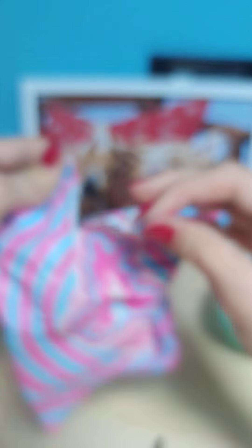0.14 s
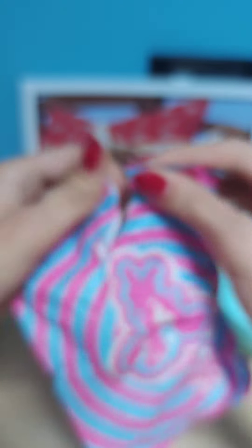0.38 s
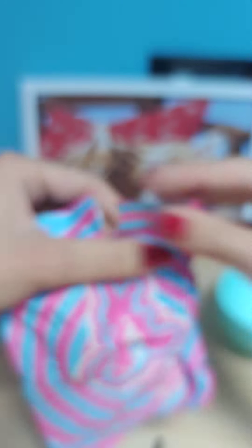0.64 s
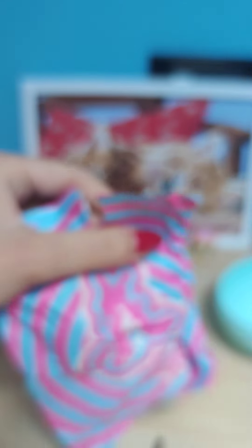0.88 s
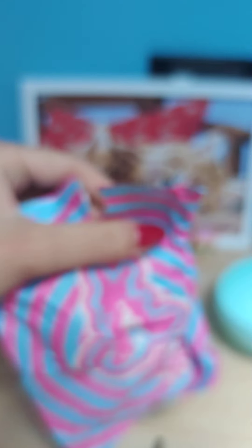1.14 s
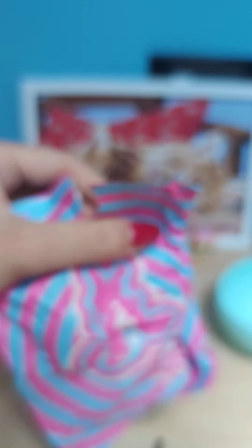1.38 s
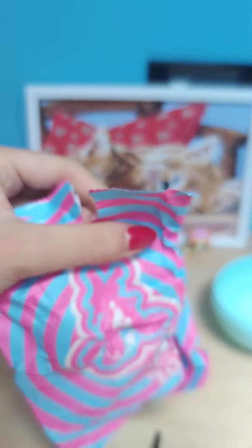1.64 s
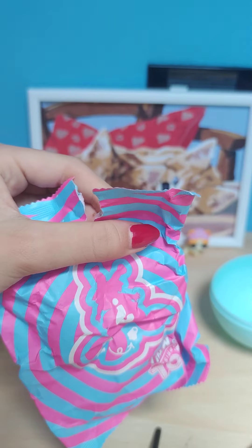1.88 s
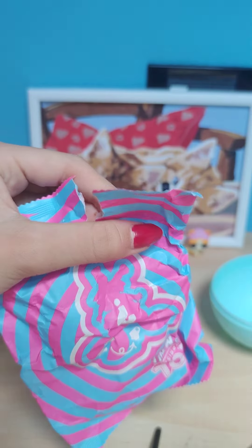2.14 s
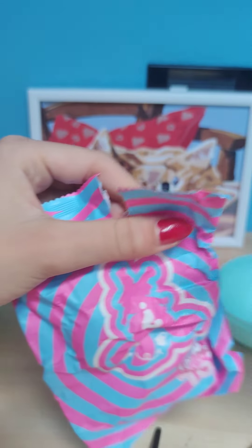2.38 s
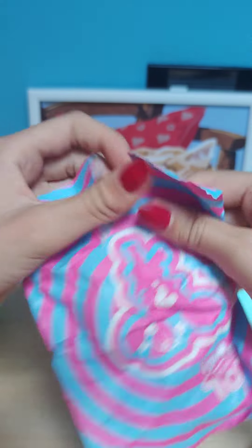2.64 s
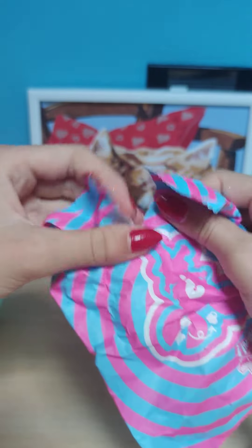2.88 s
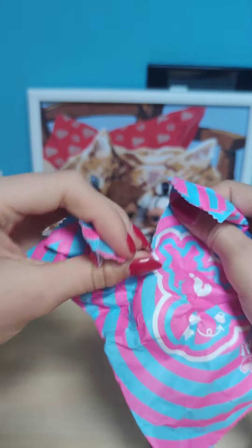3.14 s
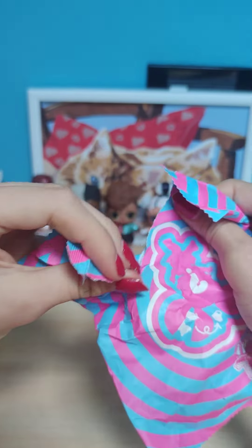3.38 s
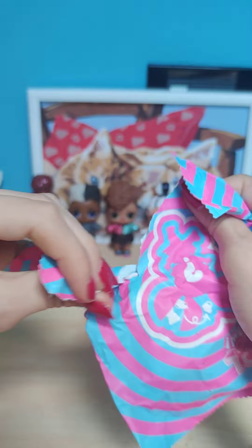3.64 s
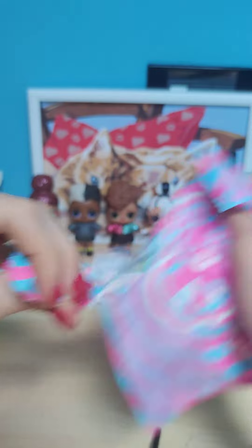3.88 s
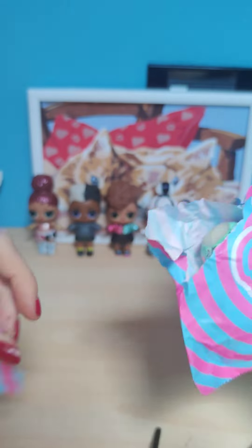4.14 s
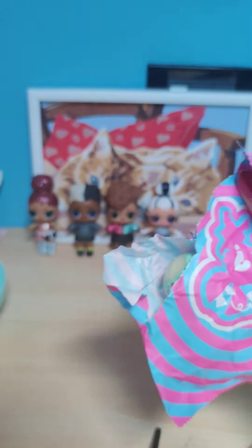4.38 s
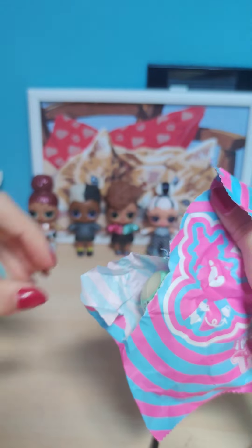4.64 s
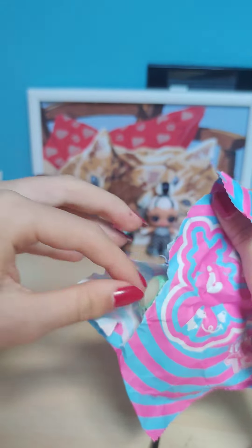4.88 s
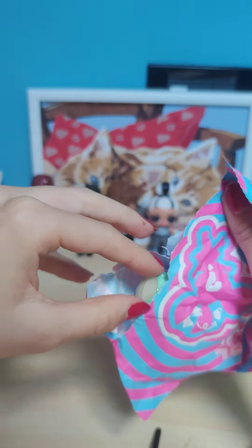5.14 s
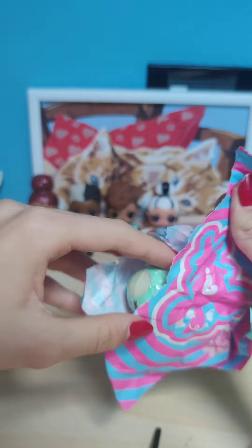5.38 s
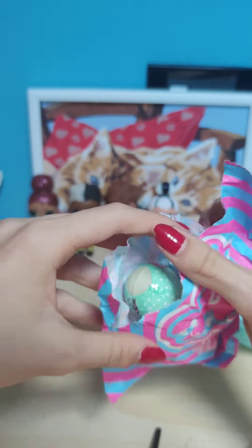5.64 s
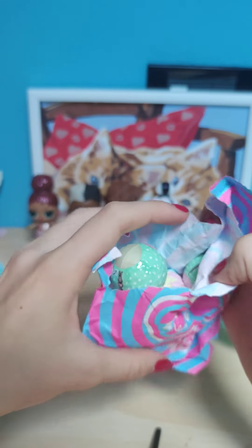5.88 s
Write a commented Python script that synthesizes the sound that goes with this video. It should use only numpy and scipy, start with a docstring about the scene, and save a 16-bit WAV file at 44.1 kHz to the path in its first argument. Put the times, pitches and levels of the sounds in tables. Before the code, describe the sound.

Crisp plastic wrapper crackles and rips on a desk in a small quiet room, its busy bouts separated by near silence and faint hiss.

```python
"""Hands tear and crumple a thin plastic pouch on a desk, close to two microphones, in a small quiet room.
A tear and sharp snaps open over a bed of tiny crackles; near silence follows, then a faint low tone.
A long dense bout of crumpling comes next, with jolts of the desk, then sparse snaps and a last busy bout.
Shaped noise makes the snaps, crackle and tears; low resonances boom along as the air and walls of the pouch.
Reflections and a short tail answer the pouch, and the microphones hiss throughout."""
import sys
import numpy as np
from scipy import signal
from scipy.fft import rfft, irfft, next_fast_len
from scipy.io import wavfile
from scipy.ndimage import uniform_filter1d, map_coordinates

SR = 44100
rng = np.random.default_rng(int(sys.argv[2]) if len(sys.argv) > 2 else 0)


def invert_db(level):
    """Linear amplitude ratio for a level in decibels (20 dB per decade), elementwise."""
    return 10 ** (np.asarray(level, dtype=float) / 20)


def transcribe(u):
    """Save the signal u as a 16-bit wav file named by the first command-line argument.

    u: samples, shape (n,) or (channels, n), limited to [-1, 1]; the rate is SR.
    q: integer samples, one column per channel.
    """
    v = np.clip(np.atleast_2d(u).T, -1, 1)
    q = np.round(v * 32767).astype(np.int16)
    wavfile.write(sys.argv[1], SR, q)


N = 264908

# Creases that buckle. Each row: start in seconds, peak in dB, panel pitch in Hz,
# treble crack against the panel in dB, pouch boom against the snap in dB.
BUCKLES = [(0.0064, -7.5, 3490, -20.5, -30), (0.0263, -7.5, 4100, -17, -30.5),
           (0.1296, -26.5, 2730, -33.5, -13), (0.2379, -27, 1960, -15, -8.5), (0.2523, -24, 2140, -18, -6),
           (0.3204, -25.5, 7250, -9, -16), (0.3301, -18, 6930, -15.5, -18), (0.375, -33, 2670, -12, -7),
           (0.4254, -30, 2290, -15, -13), (0.5277, -35, 1430, -8.5, -1.5), (0.5651, -12, 2540, -33, -20),
           (0.6604, -13.5, 3440, -17.5, -19.5), (0.6834, -30.5, 1980, -26.5, -20),
           (1.259, -54, 1260, -24, -20), (2.1839, -44.5, 3790, -19, -6.5), (2.4269, -43.5, 2100, -15, -2.5),
           (2.4718, -27.5, 2100, -26, -15.5), (2.5855, -23.5, 2575, -17.5, -21),
           (2.602, -25.5, 2080, -16.5, -9), (2.6429, -25, 1960, -24, -25), (2.7013, -24.5, 2540, -10, -5),
           (2.7262, -7, 4840, -24.5, -44), (2.7546, -14, 4140, -14.5, -37), (2.8978, -14, 5290, -23.5, -28),
           (2.9272, -15, 4550, -16, -34), (2.9412, -13.5, 2100, -20, -32), (2.9642, -19.5, 7070, -22, -41),
           (2.9816, -16, 3130, -17, -34), (2.9925, -25, 3010, -10.5, -32), (3.039, -15, 2690, -18, -37),
           (3.0694, -18.5, 2050, -8, -19), (3.0944, -10.5, 4830, -14.5, -45),
           (3.1288, -9, 3790, -21.5, -38), (3.1862, -24.5, 5610, -17, -17), (3.2216, -20, 2050, -22, -9),
           (3.272, -17.5, 2080, -17, -35), (3.2994, -23, 4110, -12.5, -37),
           (3.3189, -7.5, 5320, -24.5, -53), (3.3568, -24, 2060, -24, -33),
           (3.4331, -20.5, 2100, -15.5, -36), (3.4481, -17, 2020, -16, -38),
           (3.4635, -18.5, 1260, -15, -26), (3.4764, -9.5, 4030, -22.5, -27.5),
           (3.4894, -12.5, 2600, -22.5, -14), (3.5269, -14.5, 2640, -23, -32),
           (3.5648, -21.5, 1730, -24.5, -26), (3.5773, -16, 2620, -26, -23),
           (3.5902, -13.5, 4070, -30, -29.5), (3.6119, -33.5, 2290, -13, -18),
           (3.6274, -16, 1830, -25.5, -19.5), (3.6361, -7.5, 2590, -18.5, -28),
           (3.6526, -8.5, 2100, -19, -38), (3.6844, -6.5, 2530, -20, -17.5),
           (3.6885, -12, 2230, -21.5, -22.5), (3.7199, -22, 1940, -19, -13),
           (3.7409, -13, 2770, -14.5, -12), (3.7728, -11.5, 1800, -23, -26),
           (3.7784, -16.5, 3110, -22.5, -23), (3.7964, -22.5, 2640, -30, -27),
           (3.8482, -10, 3460, -11.5, -22), (4.0213, -25, 1740, -21, -29), (4.0652, -13, 3530, -19, -43),
           (4.2822, -44.5, 2310, -19, -24), (4.5356, -36.5, 2210, -25, -22),
           (4.6154, -29, 1750, -33, -12.5), (4.7486, -30, 1300, -25, -13), (4.8638, -46, 2130, -19.5, -22),
           (4.9137, -41.5, 1070, -13, 0), (4.9716, -34.5, 1760, -30, -25), (5.1103, -33.5, 1030, -23, -8),
           (5.1926, -27.5, 1210, -22.5, -11), (5.253, -29, 2270, -22, -13),
           (5.3073, -40.5, 2260, -10.5, -5), (5.3328, -31, 5080, -19, -7), (5.3472, -26.5, 2650, -22, -12),
           (5.4524, -23, 6850, -21, -26), (5.4989, -21.5, 5110, -24, -29),
           (5.5243, -27.5, 1740, -22.5, -18), (5.5398, -21.5, 2570, -21, -35),
           (5.5952, -22, 2100, -15.5, -34), (5.6087, -23.5, 1780, -15.5, -37),
           (5.6795, -23, 4470, -27, -18.5), (5.7039, -25, 2750, -21, -16), (5.7947, -13.5, 2620, -26, -39),
           (5.8307, -23.5, 2150, -19, -28), (5.8601, -19.5, 2090, -12.5, -25),
           (5.8765, -12.5, 1810, -9, -21), (5.915, -17, 2620, -13, -13), (5.9574, -24, 2710, -25, -24),
           (5.9708, -12.5, 2660, -27, -19.5), (5.9974, -23.5, 3506, -18.5, -19)]


def unit(x):
    """Scaled to rms 1."""
    return x / np.sqrt(np.mean(x ** 2) + 1e-20)


def along(points, hz):
    """(Hz, value) points read on a log frequency axis."""
    f, v = np.transpose(points)
    return np.interp(np.log(hz + 1), np.log(f + 1), v)


def filtered(x, response):
    """x times a complex response of frequency."""
    m = next_fast_len(N + SR // 2)
    return irfft(rfft(x, m) * response(np.fft.rfftfreq(m, 1 / SR)), m)[..., :N]


def mode(hz, centre_hz, width_hz):
    """One resonance, with gain 1 at its centre."""
    return 1j * hz * width_hz / (centre_hz ** 2 - hz ** 2 + 1j * hz * width_hz)


def wobble(rate):
    """A smooth random curve, rate knots a second."""
    knots = rng.standard_normal(round(N * rate / SR) + 4)
    return map_coordinates(knots, [np.arange(N) * rate / SR])


def radiated(noise, hz, alike_hz):
    """Spectra for both microphones: a bent sheet sends them alike lows but unrelated highs."""
    turn = np.arccos(1 / (1 + (hz / alike_hz) ** 2)) / 2
    mid, side = rfft(noise) * [np.cos(turn), np.sin(turn)]
    return np.array([mid + side, mid - side])


def pouch(hz):
    """Response of the air and walls of the pouch: low resonances of alternating sign."""
    # Each row: centre in Hz, width in Hz, gain in dB ahead of the broad resonance below.
    resonances = [(250, 260, -5), (330, 83, 2.5), (459, 55, 9), (576, 1500, 0.5)]
    total = sum((-1) ** k * invert_db(db) * mode(hz, centre, width)
                for k, (centre, width, db) in enumerate(resonances))
    return total * mode(hz, 210, 810) ** 2


def folds(count, spread_db, clump_db, smooth):
    """Creases give way at random, most tiny, a few larger, in clumps, over a smooth share of sliding."""
    jumps = np.zeros((2, N))
    start = (rng.random(count) * N).astype(int)
    size_db = spread_db * rng.exponential(size=count)
    side_db = np.outer([1, -1], 2.1 * rng.standard_normal(count))
    jumps[:, start] = invert_db(size_db + side_db)
    clumped = jumps * invert_db(clump_db * wobble(40))
    fade = np.exp(-np.arange(600) / SR / 0.0023)  # each crease dies over 2.3 ms
    return unit(signal.fftconvolve(clumped, fade[None], axes=1)[:, :N]) + smooth


def patches(x, depth_db):
    """Each fold of the sheet favours its own part of the spectrum for a moment."""
    z = signal.stft(x, nperseg=256)[2]
    field = rng.standard_normal(z.shape[1:])
    for axis in (0, 1):  # blurred over frequency, then time
        field = uniform_filter1d(field, size=9, axis=axis)
    return signal.istft(z * invert_db(depth_db * unit(field)), nperseg=256)[1][:, :N]


def film(envelope, body, tilt, boom):
    """The sheet hisses under the envelope of its folds, and the pouch booms along."""
    # Colour of the crackle. Each row: frequency in Hz, relative level in dB.
    film_colour = [(350, -21), (600, -27), (833, -8.5), (1260, -5.5), (1890, -3.5), (2080, 2.5),
                   (2420, -1.5), (6320, -3), (15800, -20)]
    f = np.fft.rfftfreq(N, 1 / SR)
    noise = irfft(radiated(rng.standard_normal((2, N)), f, alike_hz=1800), N)
    broken = envelope * noise
    grains = filtered(patches(broken, depth_db=2.5), lambda hz: invert_db(along(film_colour, hz)))
    treble = filtered(grains, lambda hz: 1 / (1 + (7000 / (hz + 1)) ** 4))
    hissing = (grains - treble + tilt * treble) / np.std(grains)
    flex = broken * invert_db(2.7 * wobble(40))
    return body * hissing + boom * unit(filtered(flex, pouch))


def rips():
    """The film tears or slides in one go: it starts at once, swells as a dense volley of breaks and stops."""
    # Each row: start in seconds, end in seconds, level in dB before the swell, treble tilt in dB.
    tears = [(0, 0.021, -19, 3.5), (0.416, .48, -43.5, -0.5), (2.162, 2.229, -59.5, -19),
             (2.392, 2.459, -58.5, 3.5), (3.031, 3.112, -35, 3.5), (3.439, 3.499, -30, 4),
             (3.851, 3.96, -19.5, 6.5), (4.181, 4.245, -57, 6), (4.373, 4.446, -46.5, 7.5),
             (4.907, 4.936, -57, 3), (4.955, 4.974, -57, 3.5), (5.107, 5.149, -52.5, 5),
             (5.302, 5.363, -47, 0.5)]
    boom_db = -13.5  # pouch under the tear
    t, body, tilt = np.arange(N) / SR, np.zeros(N), np.ones(N)
    for start, end, db, tilt_db in tears:
        attack = np.clip((t - start) / 0.0015, 0, 1)
        release = np.exp(-np.maximum(t - end, 0) / 0.013) * (t < end + .06)
        swell = 0.76 + 0.49 * np.sin(np.pi * np.clip((t - start) / (end - start), 0, 1))
        gate = attack * release * swell
        body = body + invert_db(db) * gate
        tilt[gate > 0] = invert_db(tilt_db)
    grain = folds(count=6000, spread_db=2.8, clump_db=1.8, smooth=0.24)
    return film(grain, body, tilt, invert_db(boom_db) * body)


def crackle():
    """Countless small creases follow the effort of the hands and flare after every snap."""
    # The working hands. Each row: time in seconds, effort in dB.
    hands = [(0, -41), (.06, -49.5), (.19, -55.5), (.3, -47.5), (.52, -45), (.7, -49), (.8, -79.5),
             (2.25, -79), (2.4, -63), (2.5, -53), (2.6, -40.5), (2.78, -47), (2.87, -47.5), (2.93, -42),
             (3.15, -46.5), (3.24, -38.5), (3.4, -55), (3.6, -56), (3.68, -34.5), (3.83, -46.5),
             (3.98, -35), (4.1, -63), (4.35, -70), (4.48, -54.5), (4.58, -72), (4.68, -64), (4.8, -71),
             (5.07, -62.5), (5.2, -49.5), (5.28, -60.5), (5.36, -47.5), (5.66, -44), (5.76, -50.5),
             (6, -37.5)]
    after_db, after_s = -34, .022  # a snap unsettles nearby folds: crackle under its peak, time to settle
    reference_db = -49  # effort at which treble and boom are neutral
    brightens, boom_lags = .08, .2  # per dB of effort above it: dB of treble gained, dB of boom lost
    tilt_db, tilt_swing_db = 0.7, 1.5  # treble against the crackle, how far it wanders
    boom_db, boom_swing_db = -6, 2.5  # pouch against the crackle, how far it wanders
    t = np.arange(N) / SR
    flare = sum(invert_db(db + after_db) * (t > s) * np.exp(-np.abs(t - s) / after_s) for s, db, *_ in BUCKLES)
    time_s, effort_db = np.transpose(hands)
    body = invert_db(np.interp(t, time_s, effort_db)) + flare
    effort = body / invert_db(reference_db)
    tilt = invert_db(tilt_db + tilt_swing_db * wobble(8.9)) * effort ** brightens
    boom = body * invert_db(boom_db + boom_swing_db * wobble(8)) * np.maximum(effort, .2) ** -boom_lags
    grain = folds(count=2600, spread_db=2.4, clump_db=1.6, smooth=0.3)
    return film(grain, body, tilt, boom)


def snaps(size=2048):
    """Each buckling crease shakes its panel for a few milliseconds, cracks in the treble and pushes the pouch."""
    # the pouch is carried slowly from left to right: left against right
    pan_start_db, pan_drift_db_per_s, pan_scatter_db = 0.5, -0.26, 3
    out, push = np.zeros((2, N + size)), np.zeros(N)
    t, f = np.arange(size) / SR, np.fft.rfftfreq(size, 1 / SR)
    for s, db, hz, crack_db, boom_db in BUCKLES:
        cycles = t * hz  # large, low panels take longer to jump and to settle
        settle = np.exp(-cycles / 2.1) + .22 * np.exp(-t / .0045)
        run = (1 - np.exp(-cycles / .6)) * settle
        jolt = radiated(run * rng.standard_normal((2, size)), f, alike_hz=1930)
        neighbours_hz = hz * np.exp(0.23 * rng.standard_normal(3))
        neighbours = sum(mode(f, c, 0.043 * c) for c in neighbours_hz)
        broad = mode(f, hz, 1.8 * hz) * mode(f, hz, 2.0 * hz)
        panel = irfft(jolt * broad * (.98 + mode(f, hz, 0.065 * hz) + 0.58 * neighbours))
        crack = irfft(jolt * mode(f, 10500, 10000) ** 2)
        snap = unit(panel) + invert_db(crack_db) * unit(crack)
        snap = snap / np.abs(snap).max(axis=1, keepdims=True)
        pan_db = pan_start_db + pan_drift_db_per_s * s + pan_scatter_db * rng.standard_normal()
        side = invert_db(np.array([[pan_db], [-pan_db]]) / 2)
        at = round(s * SR)
        out[:, at:at + size] += side * invert_db(db) * snap
        push[at] = invert_db(db + boom_db)
    boom = filtered(push, pouch) / np.abs(irfft(pouch(f))).max()
    return out[:, :N] + boom


def room(x):
    """The desk answers first, then a tail in which each frequency dies at its own speed."""
    # Nearby surfaces. Each row: delay in seconds, level in dB.
    surfaces = [(.0012, -37), (.0028, -23.5), (.0055, -17)]
    # Decay of the tail. Each row: frequency in Hz, time to fall 60 dB in seconds.
    decay = [(200, 0.18), (2000, 0.42), (8000, 0.36), (15000, 0.51)]
    # each reflection reaches the opposite microphone
    early = filtered(x[::-1], lambda f: sum(invert_db(db) * np.exp(-2j * np.pi * f * s) for s, db in surfaces))
    hz, t, z = signal.stft(rng.standard_normal((2, SR // 2)), SR, nperseg=256)
    tail = signal.istft(z * invert_db(-60 * t / along(decay, hz)[:, None]), SR, nperseg=256)[1]
    delayed = np.pad(x, ((0, 0), (250, 0)))  # 250 samples
    late = signal.fftconvolve(delayed, tail / np.linalg.norm(tail[0]), axes=1)[:, :N]
    return early + invert_db(-13) * late


def microphone_hiss():
    """Each microphone adds its own steady noise, from low rumble to hiss."""
    # Each row: frequency in Hz, relative level in dB.
    hiss_colour = [(12, -27), (20, 4.5), (61, -15), (134, -20), (154, -23), (434, -29), (542, -32),
                   (780, -36), (923, -36.5), (6540, -47), (14700, -43), (16000, -50.5)]
    level_db = -54
    noise = rng.standard_normal((2, N))
    return invert_db(level_db) * unit(filtered(noise, lambda f: invert_db(along(hiss_colour, f))))


def faint_tone():
    """A faint, unsteady low tone glides up and holds for a moment: a sine of wandering pitch and level."""
    start_s, end_s, fade_s, level_db = 1.82, 2.2, .07, -75
    from_hz, to_hz, glide_s = 365, 445, .09
    t = np.arange(N) / SR
    hz = to_hz - (to_hz - from_hz) * np.exp(-np.abs(t - start_s) / glide_s)
    gate = np.clip(np.minimum(t - start_s, end_s - t) / fade_s, 0, 1)
    level = np.sqrt(2) * gate * invert_db(level_db + 2.0 * wobble(24.3))
    return level * np.sin(2 * np.pi * np.cumsum(hz + 7 * wobble(40)) / SR)


def shake():
    """Low vibration comes through the desk as noise near 45 Hz, swelling to each jolt and dying after it."""
    # Hands jolt the desk. Each row: time of the jolt in seconds, level in dB.
    jolts = [(2.7, -49), (3.07, -57), (3.5, -62), (3.9, -52)]
    rise_db_per_s, fall_db_per_s = 108, 117.5
    t = np.arange(N) / SR
    low = unit(filtered(rng.standard_normal((2, N)), lambda hz: mode(hz, 45, 68) ** 2))
    swell = sum(invert_db(db - np.maximum(rise_db_per_s * (s - t), fall_db_per_s * (t - s))) for s, db in jolts)
    return low * swell


def scene():
    """The pouch and its room, the faint tone and the shaken desk."""
    wrapper = rips() + crackle() + snaps()
    return wrapper + room(wrapper) + faint_tone() + shake()


def roll_off(x):
    """The treble ends steeply here."""
    return signal.sosfilt(signal.butter(12, 17030, fs=SR, output="sos"), x)


def record(dry):
    """Each microphone has its own colour and its own noise; nothing passes above the band limit."""
    # The two microphones differ. Each row: frequency in Hz, left against right in dB.
    balance = [(60, 13.5), (180, -4), (550, 1.5), (1650, 3), (4970, -1.5), (15000, 7.5)]
    top_hz = 15900
    ports = filtered(dry, lambda f: invert_db(np.outer([.5, -.5], along(balance, f))))
    mix = filtered(ports + microphone_hiss(), lambda f: f < top_hz)
    return roll_off(mix)


dry = scene()
out = record(dry)
transcribe(out)
```